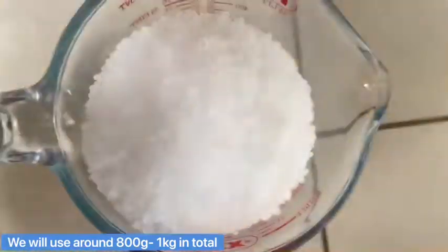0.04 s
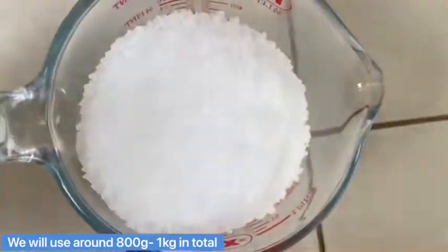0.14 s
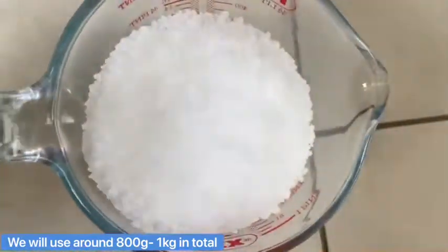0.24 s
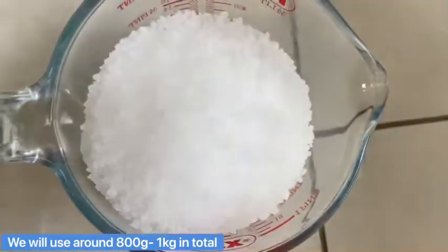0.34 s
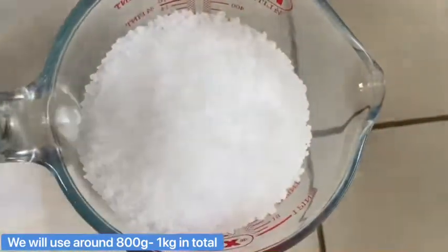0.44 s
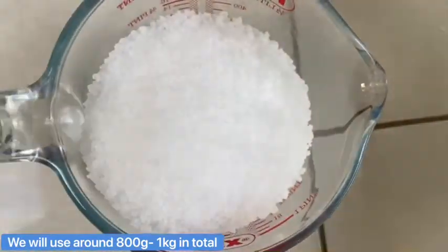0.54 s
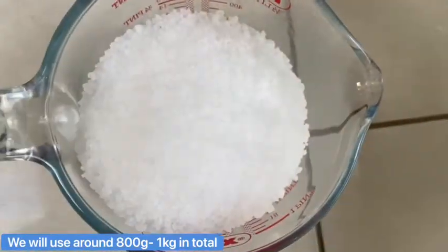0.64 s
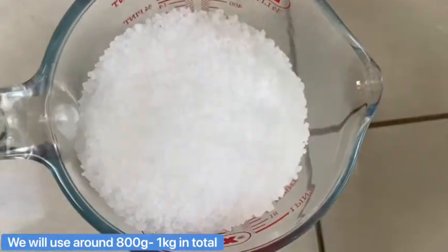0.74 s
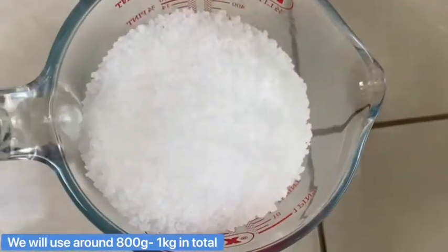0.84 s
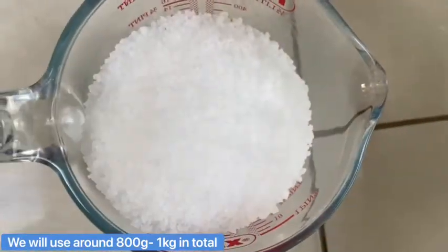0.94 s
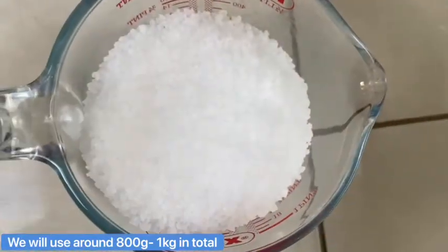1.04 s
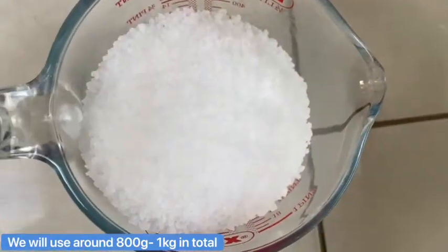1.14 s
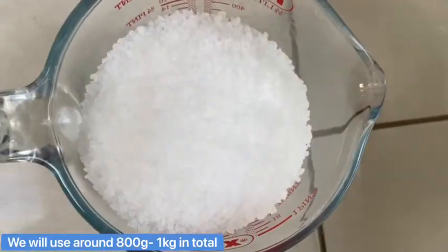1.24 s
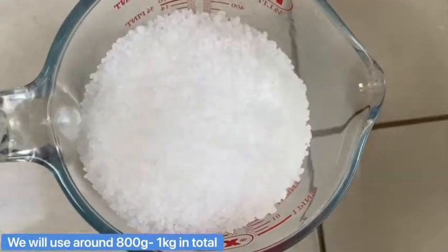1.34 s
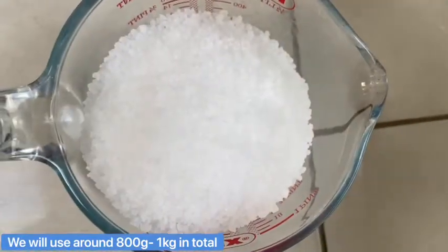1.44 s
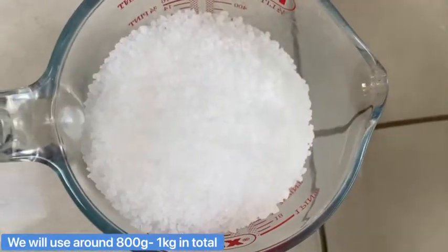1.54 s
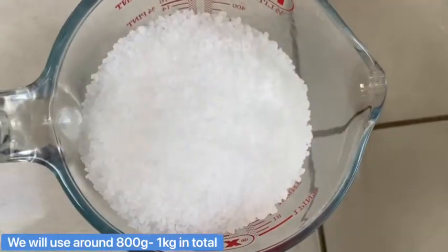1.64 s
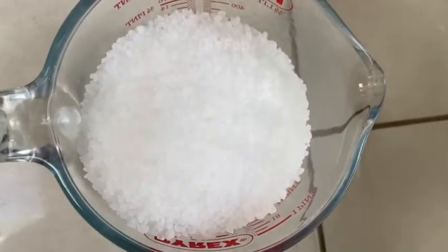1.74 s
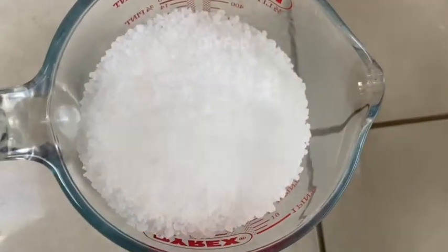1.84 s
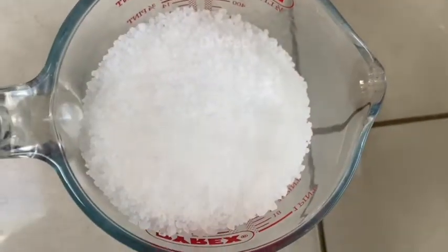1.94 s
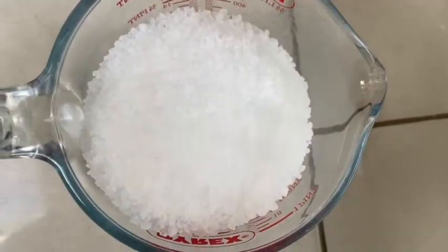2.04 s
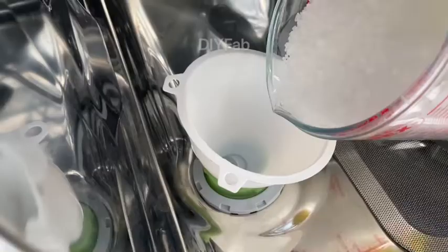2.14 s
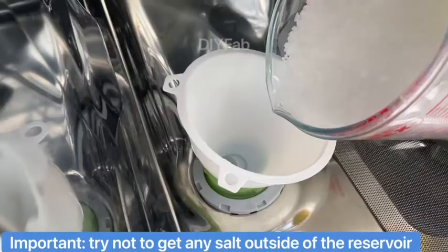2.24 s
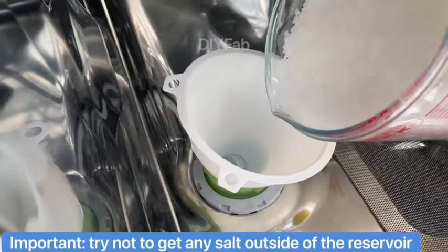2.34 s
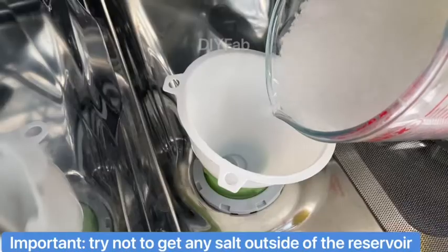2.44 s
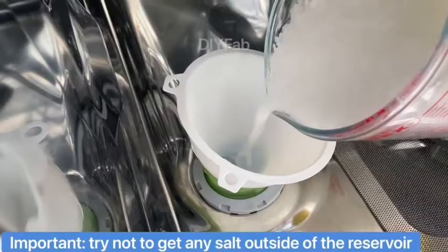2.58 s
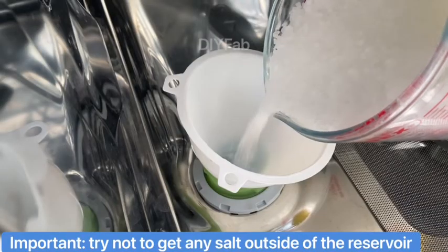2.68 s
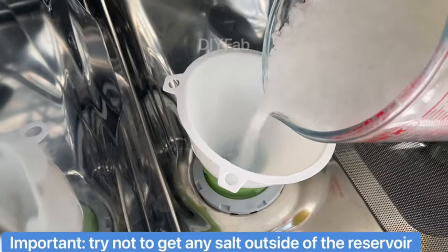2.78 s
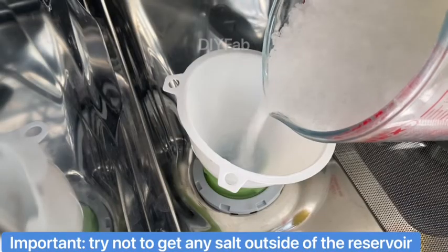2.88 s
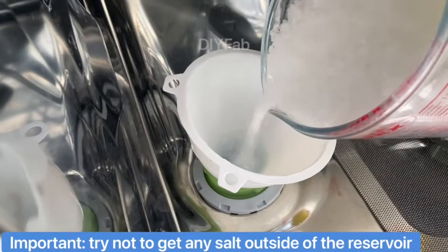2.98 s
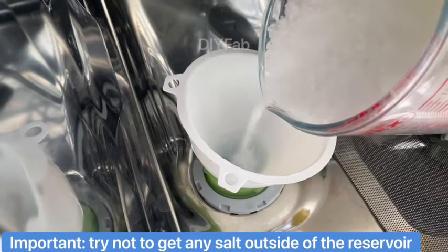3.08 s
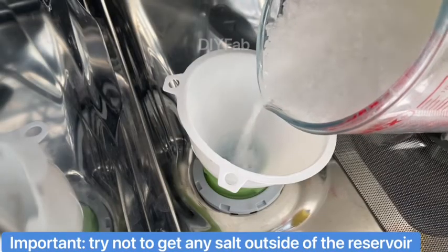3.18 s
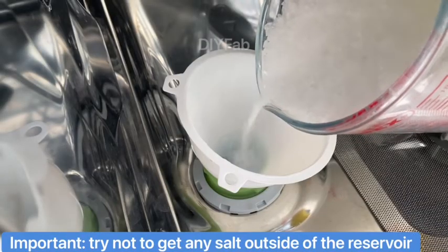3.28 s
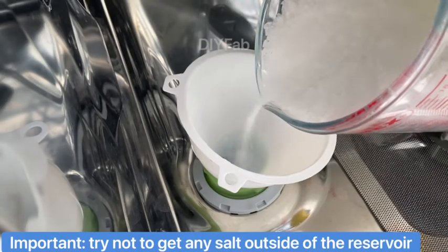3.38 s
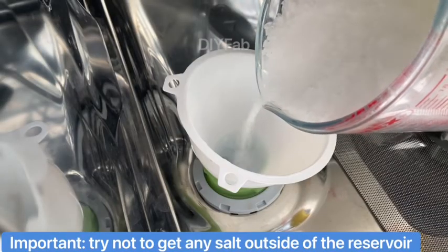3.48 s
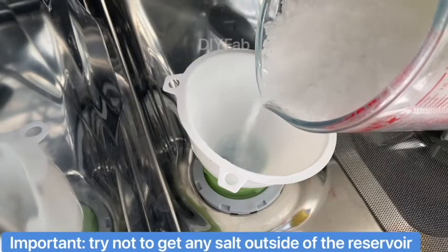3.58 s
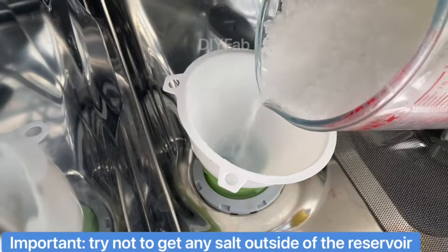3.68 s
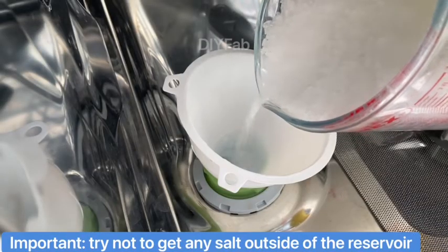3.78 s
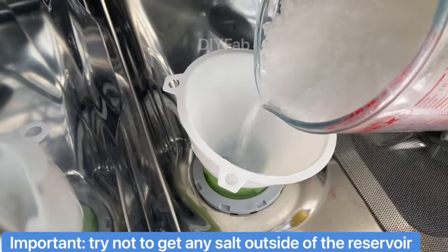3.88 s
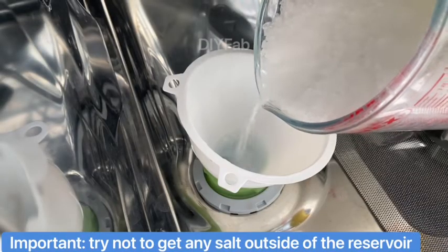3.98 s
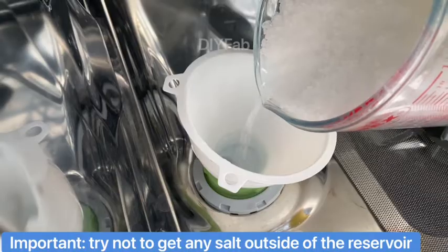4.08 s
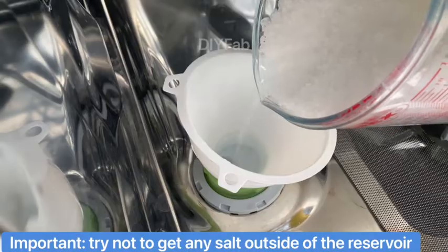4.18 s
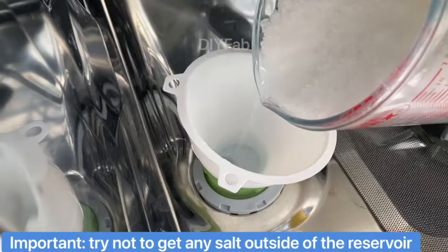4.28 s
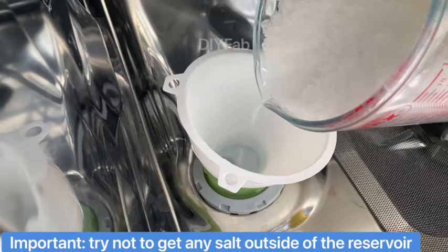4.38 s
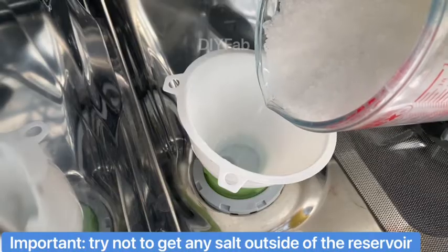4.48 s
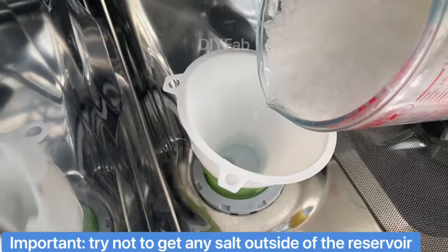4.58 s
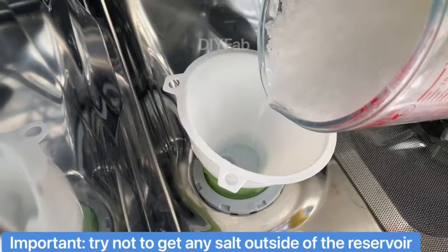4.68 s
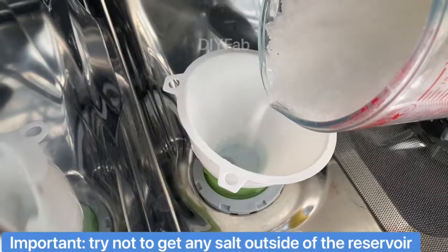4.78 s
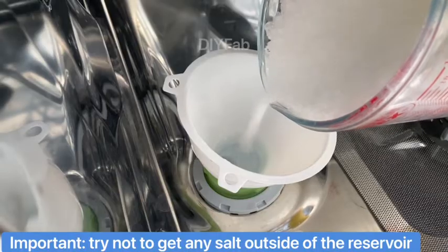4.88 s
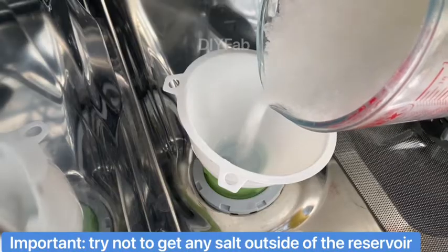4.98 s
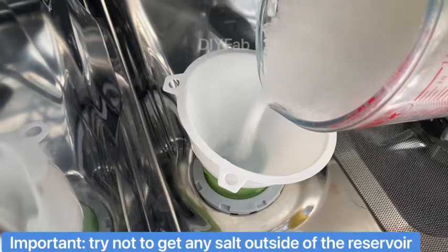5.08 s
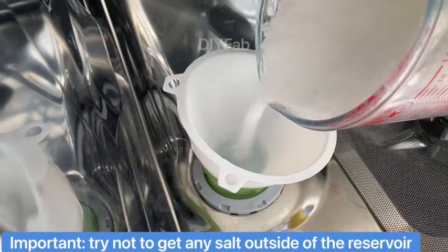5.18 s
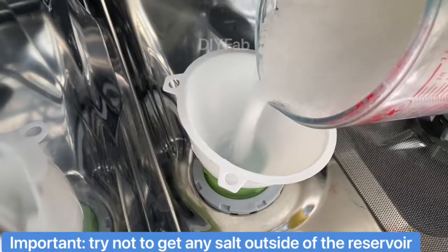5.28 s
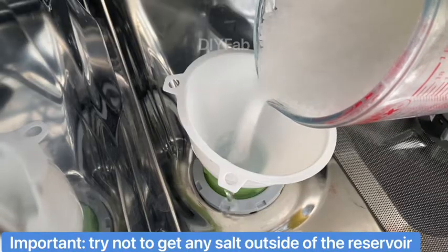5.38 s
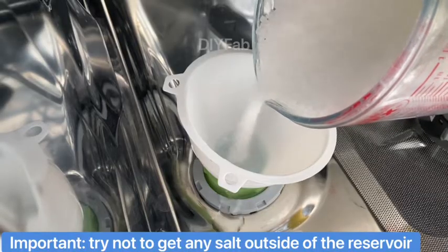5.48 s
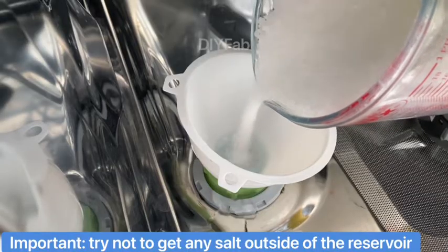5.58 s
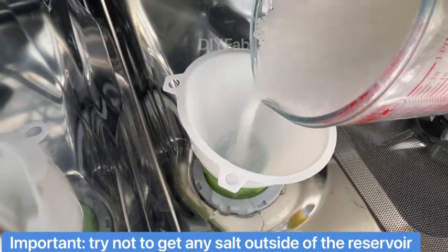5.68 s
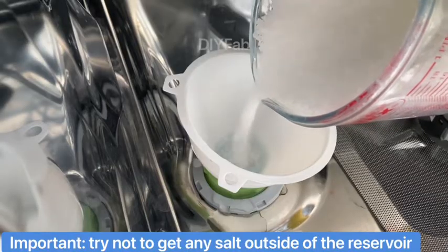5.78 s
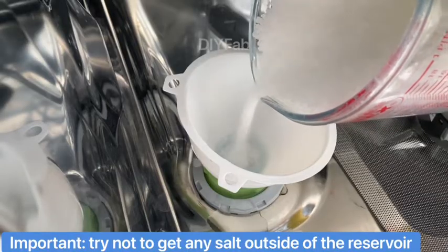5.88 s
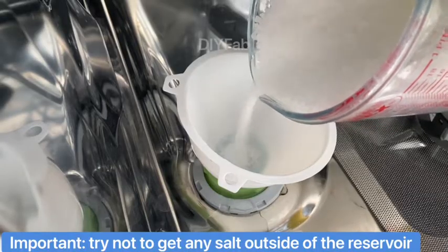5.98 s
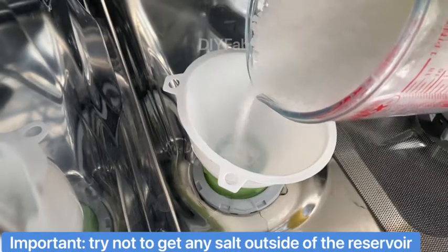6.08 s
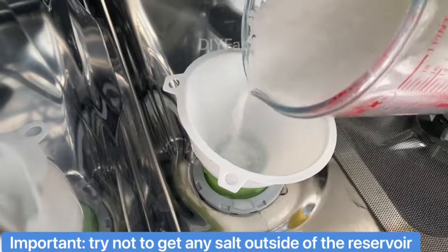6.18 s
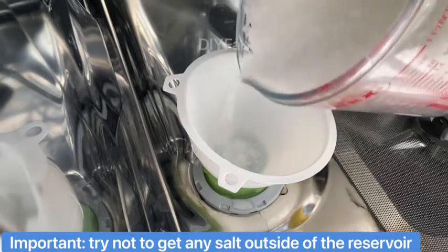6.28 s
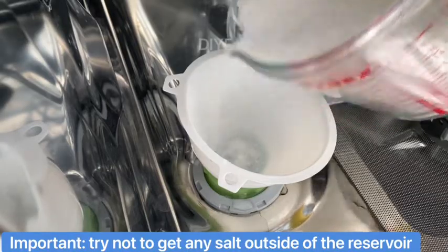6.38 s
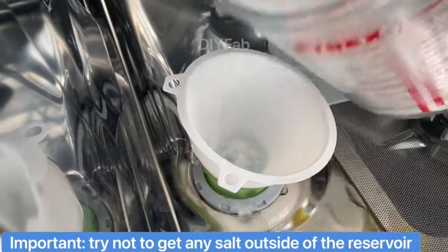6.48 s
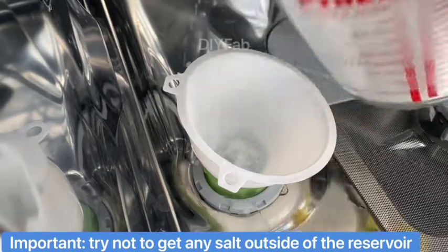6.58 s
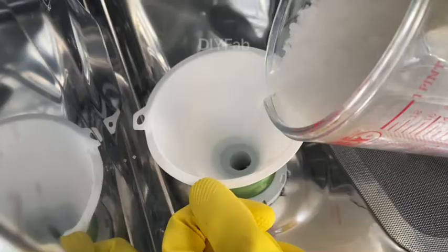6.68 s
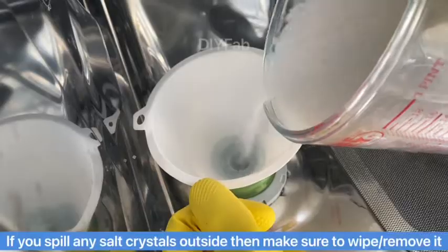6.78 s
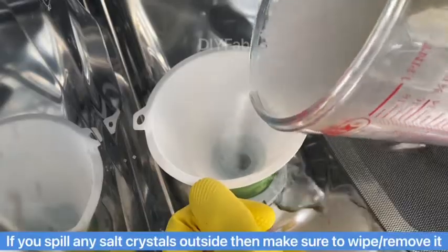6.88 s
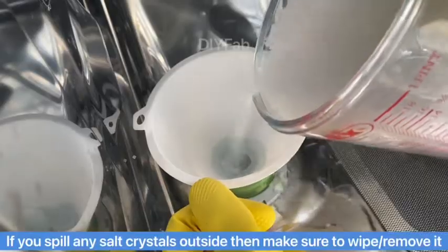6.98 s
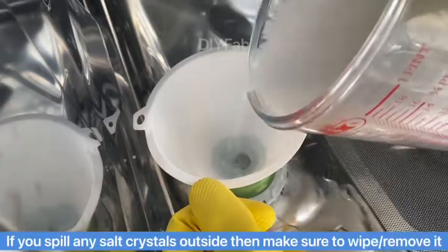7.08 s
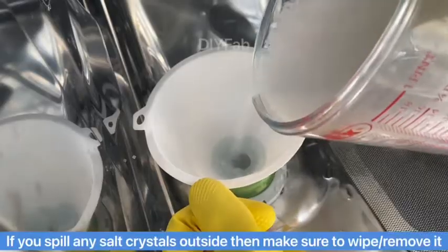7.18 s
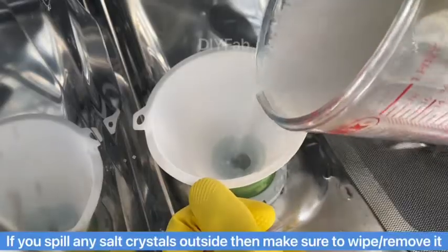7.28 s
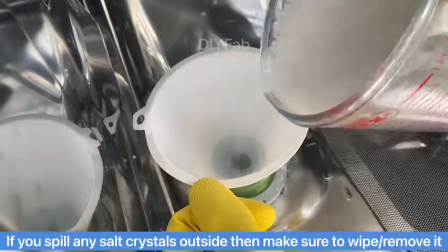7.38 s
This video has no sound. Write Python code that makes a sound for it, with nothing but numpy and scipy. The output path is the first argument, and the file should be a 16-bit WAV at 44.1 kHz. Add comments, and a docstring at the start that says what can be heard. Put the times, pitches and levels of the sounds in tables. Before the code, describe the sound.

From 0 to 0.55 seconds a plastic bag crinkles close by: a crisp crackle at once, a lull, then denser snaps from 0.35 to 0.53. It cuts to very quiet room noise, with tiny taps near 0.9 and 1.1, faint rubbing around 1.5, and soft dull knocks of a full glass jug from 1.8 to 2.14. Then a steel tub's low room noise and faint wavering machine hum begin. At about 2.49 salt slumps over the glass lip in a loud, bright, ticking rush until 2.7, thinning to a light hollow patter on the plastic funnel. It nearly stops around 4.6, with sparse pings, then swells from 4.85, with sharp ticks and another surge at 6.3. At 6.6 it cuts to triple speed: a higher hum, a strong brittle rattle at 6.84 to 6.96, another near 7.05, then smaller scattered clicks to the end, around 7.4.

```python
"""Coarse salt slides over a glass jug's lip and streams into a plastic funnel in a steel dishwasher tub.
Its many small impacts are random clicks, each with a short ring, filtered by glass and funnel; large crystals tick.
Before that a plastic bag crinkles in a quick rush, and the full jug is lifted with soft knocks, as filtered bursts.
The last of the salt rattles down at triple speed, with brighter, shorter grains.
Room noise lies under it all; drifting sine tones of a machine join with the pour and are higher at triple speed."""
import sys
import numpy as np
from scipy import signal
from scipy.fft import rfft, irfft, next_fast_len
from scipy.io import wavfile
from scipy.ndimage import uniform_filter1d

SR = 44100
rng = np.random.default_rng(int(sys.argv[2]) if len(sys.argv) > 2 else 0)


def wav_out(sig):
    """Save sig, one row per channel (or a flat mono array), as 16-bit PCM at SR to the path in sys.argv[1]."""
    wavfile.write(sys.argv[1], SR, np.round(np.clip(np.atleast_2d(sig).T, -1, 1) * 32767).astype(np.int16))


N = 327663
TIME = np.arange(N) / SR
# starts in seconds: lifting the jug, the pour in the tub, the last salt at triple speed
JUG_S, TUB_S, FAST_S = 0.55, 2.145, 6.607


def amp(db):
    """Level law: converts decibels to an amplitude gain."""
    return 10 ** (np.asarray(db) / 20)


def unit(x):
    """Normalisation: scales a stereo sound so that the mean of its channels has rms 1."""
    return x / np.sqrt(np.mean(x.mean(0) ** 2) + 1e-20)


def read(table, hz):
    """Logarithmic pitch scale: interpolates a table's columns over log frequency."""
    table_hz, *columns = np.transpose(table)
    return [np.interp(np.log(hz + 1), np.log(table_hz + 1), c) for c in columns]


def between(start, end, fade=.008):
    """Gating: passes sound between two times, with short ramps."""
    opening = np.clip((TIME - start) / fade + .5, 0, 1)
    closing = np.clip((end - TIME) / fade + .5, 0, 1)
    return opening * closing


def curve(points):
    """Amplitude envelope: one gain per sample from straight lines in decibels."""
    return amp(np.interp(TIME, *np.transpose(points)))


def swells(rows, rise_db_per_s):
    """Incoherent addition: gestures rise, hold and fade, and overlapping ones add in power."""
    power = np.zeros(N)
    for s, length, db, fade_db_per_s in rows:
        early = np.maximum(s - TIME, 0)
        late = np.maximum(TIME - s - length, 0)
        level_db = db - rise_db_per_s * early - fade_db_per_s * late
        power += amp(np.maximum(level_db, -200)) ** 2
    return np.sqrt(power)


def clumps(spread_db, count):
    """Random modulation: an uneven gain, as crystals and folds give way in small groups."""
    knots = np.linspace(0, TIME[-1], count)
    return amp(spread_db * np.interp(TIME, knots, rng.standard_normal(count)))


def add(mix, s, sound):
    """Superposition: adds a sound to the mix at time s."""
    part = mix[:, max(round(s * SR), 0):][:, :sound.shape[1]]
    part += sound[:, :part.shape[1]]


def colour(x, spectrum, size=4096):
    """Minimum-phase filtering: a causal response, so the body rings after each click."""
    log_gain = np.log(amp(read(spectrum, abs(np.fft.fftfreq(size, 1 / SR)))[0]))
    response = np.exp(np.conj(signal.hilbert(log_gain)))
    taps = np.fft.ifft(response).real[:size // 2]
    return signal.oaconvolve(x, taps[None], axes=1)[:, :x.shape[1]]


def ports(x, table):
    """Interaural-style coherence: two unrelated versions of a sound become left and right microphone ports."""
    size = next_fast_len(x.shape[1] + 512)
    a, b = rfft(x, size)
    same, lead, left_db = read(table, np.fft.rfftfreq(size, 1 / SR))
    same = np.clip(same, 0, 1)
    right = (same * a + np.sqrt(1 - same ** 2) * b) * np.exp(-1j * lead)
    return irfft([a * amp(left_db / 2), right * amp(-left_db / 2)], size)[:, :x.shape[1]]


def walls(x, echo_db, count=8):
    """Early reflection: delayed copies from the hard surfaces close by."""
    out = x.copy()
    for delay_s, sign in zip(rng.uniform(.001, .009, count), rng.choice([-1, 1], count)):
        add(out, delay_s, sign * amp(echo_db) * x)
    return out


def burst(crack_s, tail_db, t60, size=6000):
    """Impact and reverberation: a brief noisy crack, then dense reflections that decay by 60 dB in t60."""
    t = np.arange(size) / SR
    return rng.standard_normal((2, size)) * (np.exp(-t / crack_s) + amp(tail_db - 60 * t / t60))


def grains(per_s, spread_db, crack_s, tail_db, t60, ring_db, ring_s, flow=1, top_hz=14000, count=8):
    """Shot noise: random impacts of uneven size, sparser in a thin flow; each family has its own short ring."""
    out, t = np.zeros((2, N)), np.arange(3000) / SR
    for hz in np.geomspace(3700, top_hz, count):
        size = amp(spread_db * np.minimum(rng.exponential(1, N), 4)) / np.sqrt(flow)
        struck = rng.random(N) < flow * per_s / count / SR
        clicks = struck * size * rng.choice([-1, 1], N)
        phase = hz * rng.uniform(.93, 1.07) * t + rng.random((2, 1))
        ring = np.sin(2 * np.pi * phase) * np.exp(-t / ring_s)
        grain = burst(crack_s, tail_db, t60, size=len(t)) + amp(ring_db) * ring
        out += signal.oaconvolve(clicks[None], grain, axes=1)[:, :N]
    return out


def tinkle(per_s, low_hz, high_hz, spread_db, t60, size=2000):
    """Damped oscillation: small rebounding crystals, each with a short ring at its own pitch."""
    out, t = np.zeros((2, N)), np.arange(size) / SR
    for when, pitch, strength, *phase in rng.random((int(per_s * N / SR), 5)):
        hz = low_hz * (high_hz / low_hz) ** pitch
        decay = amp(spread_db * strength ** 2 - 60 * t / t60)
        ring = np.sin(2 * np.pi * (hz * t + np.c_[phase])) * decay
        add(out, when * N / SR, ring)
    return out


def strike(sound, strength_db):
    """Short-time power: sets the rms of the loudest two milliseconds to half the given strength."""
    power = uniform_filter1d(sound.mean(0) ** 2, size=88)
    return sound * amp(strength_db) / np.sqrt(power.max()) / 2


def blows(rows, port_table, push_db, crack_s, tail_db, t60, shrink=0):
    """Resonance: a clean push and rough crack ring one broad band; with shrink, higher ones are briefer."""
    out, hz = np.zeros((2, N)), np.geomspace(20, 20000, num=90)
    for s, db, centre_hz, octaves in rows:
        away = np.log2(hz / centre_hz) / octaves
        shape_db = np.maximum(-20 * np.log10(1 + away ** 4), -100)
        stretch = (1000 / centre_hz) ** shrink  # crack_s and t60 hold at 1 kHz
        hit = burst(crack_s * stretch, tail_db, t60 * stretch)
        hit[:, 0] += amp(push_db) * np.sqrt(stretch)
        thud = colour(hit, np.c_[hz, shape_db]) * np.linspace(1, 0, num=hit.shape[1])
        add(out, s, strike(ports(thud, port_table), db))
    return out


def ticks(rows, spectrum, port_table, crack_s, tail_db, t60):
    """Spectral tilt: single large crystals, each with its own balance of bass and treble."""
    out, (hz, level_db) = np.zeros((2, N)), np.transpose(spectrum)
    for s, db, bright_db in rows:
        tilted = np.c_[hz, level_db + bright_db * np.log2(hz / hz[-1])]
        add(out, s, strike(ports(colour(burst(crack_s, tail_db, t60), tilted), port_table), db))
    return out


# Room at the two ports. Each row: frequency in Hz, likeness from 0 to 1, left lead in radians,
# left minus right in dB.
ROOM_PORTS = [(60, .985, 0, .3), (300, .86, 0, 1), (8000, .5, 0, 1)]


def air(spectrum):
    """Stationary noise: steady filtered room noise with rms 1."""
    return unit(ports(colour(rng.standard_normal((2, N)), spectrum, size=16384), ROOM_PORTS))


def hum(lines, waver, count=40):
    """Line spectrum: machine tones that drift in phase (waver in radians) and strength."""
    knots, out = np.linspace(0, TIME[-1], count), np.zeros(N)
    for hz, db in lines:
        drift, swell = (np.interp(TIME, knots, v) for v in rng.standard_normal((2, count)))
        tone = np.sin(2 * np.pi * hz * TIME + waver * drift)
        out += np.sqrt(2) * amp(db + 1.8 * swell) * tone
    return out


# Room noise by the bag. Each row: frequency in Hz, relative density in dB per Hz.
BAG_AIR = [(30, -28), (150, -28), (235, 3.5), (335, -12), (700, -15.5), (2000, -25), (8000, -46.5)]
# Room noise by the jug. Each row: frequency in Hz, relative density in dB per Hz.
JUG_AIR = [(25, -10), (55, -2.5), (110, -9), (170, -16.5), (240, -8.5), (450, -26), (930, -41), (3500, -48),
           (12000, -58)]
# Room noise in the tub. Each row: frequency in Hz, relative density in dB per Hz.
TUB_AIR = [(20, -15.5), (48, 0), (80, 1), (115, -4.5), (150, -11), (200, -19), (290, -10.5), (400, -18),
           (900, -25.5), (2000, -38), (8000, -70)]
# Room noise at triple speed. Each row: frequency in Hz, relative density in dB per Hz.
FAST_AIR = [(30, -39), (90, -13), (140, 4.5), (230, 1.5), (430, -8.5), (520, -15), (1100, -7.5),
            (1500, -17), (8000, -28)]
# Machine tones in the tub. Each row: frequency in Hz, level in dB before gain and swell.
HUM = [(48.4, -55), (80.7, -54.5), (150.7, -64), (371.4, -64.5)]
# Machine tones at triple speed. Each row: frequency in Hz, mean level in dB.
FAST_HUM = [(140.0, -65), (393.0, -69.5), (1120, -67)]
# Swell of noise and hum in the tub. Each row: time in seconds, gain in dB.
DRONE = [(3.8, -6), (5.2, -2.5), (6.6, -5)]


def kitchen():
    """Background level: room noise, joined by hum in the tub and at triple speed."""
    start = amp(-61) * air(BAG_AIR) * between(-1, JUG_S)
    start += amp(-59) * air(JUG_AIR) * between(JUG_S, TUB_S)
    tub = amp(-52) * air(TUB_AIR) + amp(2.0) * hum(HUM, waver=1.48)
    fast = amp(-57.5) * air(FAST_AIR) + hum(FAST_HUM, waver=2.55)
    return start + tub * curve(DRONE) * between(TUB_S, FAST_S) + fast * between(FAST_S, N)


# Squeezes of the bag, firm or light. Each row: start in seconds, length in seconds,
# level in dB before the layer gains, fade in dB per second.
SQUEEZES = [(0, 0.022, -41, 260.5), (.07, 0.042, -56.5, 147.5), (.354, 0.021, -37.5, 347.5),
            (.405, 0.0055, -40.5, 479.5), (.42, 0.092, -51, 902.5), (.504, 0.028, -35, 1205)]
# Folds snapping, and at the very start a broad click. Each row: start in seconds, strength in dB, centre in Hz,
# width in octaves.
SNAPS = [(0.002, -19, 1450, 3), (0.017, -19.5, 464, 0.78), (0.028, -23, 527, 0.74),
         (0.1052, -25, 3060, 1.32), (0.169, -19.5, 1210, 0.82), (0.353, -24, 1200, 0.86),
         (0.376, -21, 1070, 0.55), (0.4, -26.5, 1100, 1.5), (0.4992, -16, 1960, 1.04),
         (0.503, -29, 340, 0.65), (0.52, -29.5, 328, 0.68)]
# Body of the rustle. Each row: frequency in Hz, relative density in dB per Hz.
RUSTLE = [(100, -31.5), (230, -5), (400, 1.5), (530, -8), (1000, -2.5), (1700, -8), (3000, -14.5),
          (6000, -22), (15000, -41)]
# Bright crackle. Each row: frequency in Hz, relative density in dB per Hz.
CRACKLE = [(300, -26), (1500, 0), (3500, -2.5), (6500, -3.5), (10000, -5), (15500, -3.5)]
# Bag at the two ports. Each row: frequency in Hz, likeness from 0 to 1, left lead in radians,
# left minus right in dB.
BAG_PORTS = [(300, .95, .2, 2), (2200, .65, .3, 1), (4500, .35, 2.3, 2), (7000, .6, 3.1, 3),
             (11000, .4, .4, 3), (13500, .75, -.3, 3)]


def bag():
    """Buckling: film crumples in tiny clicks at each squeeze, with a few large snaps."""
    crumple = swells(SQUEEZES, rise_db_per_s=1096)
    # a faint rest level remains between squeezes
    rustle, crackle = crumple + amp(-63.5), crumple + amp(-78)
    buckles = grains(per_s=1700, spread_db=3.8, crack_s=.0004, tail_db=-19, t60=.025,
                     ring_db=-17, ring_s=.0006, count=4)
    buckles = walls(buckles, echo_db=-21.5) * clumps(spread_db=2.0, count=900)
    body = amp(1.0) * rustle * unit(ports(colour(buckles, RUSTLE), BAG_PORTS))
    fizz = amp(4.5) * crackle * unit(ports(colour(buckles, CRACKLE), BAG_PORTS))
    snaps = blows(SNAPS, BAG_PORTS, push_db=16.5, crack_s=0.0016, tail_db=-2.5, t60=0.084, shrink=0.82)
    return (body + fizz + snaps) * between(-1, JUG_S)


# Fingers rubbing on the handle. Each row: start in seconds, length in seconds, level in dB,
# fade in dB per second.
RUBS = [(1.43, 0.28, -72.5, 50), (1.94, 0.0095, -55.5, 177.5), (2.06, 0.08, -65, 95)]
# Colour of the rubbing. Each row: frequency in Hz, relative density in dB per Hz.
RUB_COLOUR = [(200, -21), (600, 0.5), (760, -13.5), (1000, -25.5), (3000, -47.5)]
# Knocks of the jug, and at 2.14 s a faint click as the scene changes to the tub. Each row: start in seconds,
# strength in dB, centre in Hz, width in octaves.
KNOCKS = [(0.889, -54, 589, 0.4), (0.89, -66, 1995, 0.25), (1.08, -60, 3540, 0.55),
          (1.555, -61, 1935, 0.12), (1.815, -39.5, 75.2, 0.78), (1.886, -33, 520, 0.45),
          (1.9285, -35, 532, 0.4), (1.948, -41.5, 50.4, 0.4), (2.0525, -35, 555, 0.54),
          (2.053, -52.5, 1100, 1.3), (2.058, -34.5, 57.7, 0.52), (2.128, -39.5, 350, 0.88),
          (2.14, -63, 2990, 1)]


def jug():
    """Impact and friction: the full jug knocks dully and rubs in the hand as it is lifted."""
    rub = swells(RUBS, rise_db_per_s=298) * air(RUB_COLOUR) * between(JUG_S, TUB_S)
    return rub + blows(KNOCKS, ROOM_PORTS, push_db=20, crack_s=0.0027, tail_db=-7, t60=0.12, shrink=.4)


# Modes of the nearly empty funnel, heard at triple speed. Each row: frequency in Hz, relative level in dB.
FUNNEL_MODES = [(1730, -5), (2020, 4), (3000, 3), (3650, 4)]


def funnel(x, t60, size=4000):
    """Modal resonance: the thin plastic cone rings briefly under each crystal."""
    t = np.arange(size) / SR
    modes = sum(amp(db - 60 * t / t60) * np.sin(2 * np.pi * hz * t) for hz, db in FUNNEL_MODES)
    return signal.oaconvolve(x, modes[None] / np.linalg.norm(modes), axes=1)[:, :N]


# Rushes of the last salt. Each row: start in seconds, length in seconds, level in dB before
# the layer gains, fade in dB per second.
RUSHES = [(6.69, 0.22, -49.5, 60), (6.838, .118, -36, 326), (7.03, 0.067, -40, 112),
          (7.2, 0.0154, -43.5, 222), (7.28, 0.03, -47, 164)]
# Colour of the rattle. Each row: frequency in Hz, relative density in dB per Hz.
RATTLE = [(300, -28), (700, -15), (1750, -3), (2350, -8), (2900, 4.5), (4200, 5.5), (5200, -6.5),
          (5900, -4.5), (6800, -8.5), (8000, -1), (10200, 0.5), (15000, 5.5)]
# Single last crystals. Each row: start in seconds, strength in dB, brightness in dB per octave.
LAST_TICKS = [(6.8059, -24, 3), (6.8327, -18, 1.5), (6.8848, -19, 1), (7.009, -27.5, -1), (7.054, -22, 4),
              (7.0826, -34, -1.5), (7.103, -34, 2), (7.119, -33, 0), (7.1396, -28.5, -3),
              (7.1783, -28, -1.5), (7.1993, -23, 0.5), (7.279, -27.5, 0), (7.3058, -27.5, -2.5),
              (7.319, -25, -1.5), (7.3655, -32, -1.5), (7.385, -30.5, -2.5)]
# Pings as the last salt starts to fall. Each row: start in seconds, strength in dB, centre in Hz,
# width in octaves.
LAST_PINGS = [(6.6875, -31, 9400, 0.13), (6.751, -33, 10240, 0.049), (6.774, -35, 8100, 0.26)]
# Last salt at the two ports. Each row: frequency in Hz, likeness from 0 to 1, left lead in radians,
# left minus right in dB.
FAST_PORTS = [(200, .97, 0, 1), (1500, .8, .1, 2), (2800, .65, 1.1, 4), (3700, .5, 2.8, 6),
              (5500, .4, .3, 4), (11500, .8, .2, 3), (15000, .3, 0, 5)]


def last_salt():
    """Source and resonator: at triple speed, rushes of short bright grains and single ones ring the funnel."""
    level = np.hypot(swells(RUSHES, rise_db_per_s=653), amp(-79))  # over a faint trickle
    flow = np.clip(level / amp(-42.0), .35, 2)  # a stronger rush holds more crystals
    impacts = grains(per_s=1700, spread_db=4.3, crack_s=0.00012, tail_db=-23.0, t60=0.047,
                     ring_db=-20, ring_s=0.00074, flow=flow, count=3)
    rattle = unit(ports(colour(walls(impacts, echo_db=-6.5), RATTLE), FAST_PORTS))
    pitched = tinkle(per_s=1200, low_hz=8000, high_hz=15000, spread_db=10, t60=.012)
    rebounds = amp(-11) * unit(ports(pitched, FAST_PORTS))
    large = ticks(LAST_TICKS, RATTLE, FAST_PORTS, crack_s=.0009, tail_db=-8, t60=.05)
    pings = blows(LAST_PINGS, FAST_PORTS, push_db=17, crack_s=0.0023, tail_db=-10, t60=0.037)
    hits = level * (rattle + rebounds) * between(FAST_S, N) + large
    return hits + amp(-14.5) * funnel(hits, t60=0.057) + pings


# Ringing of the glass jug under the sliding salt. Each entry: frequency in Hz.
GLASS_HZ = [2102, 3706, 5500, 6260, 6884, 7423, 10793]


def glass(x, t60, size=8000):
    """Modal damping: the jug's modes die away soon, damped by the salt that it holds."""
    t = np.arange(size) / SR
    modes = sum(np.sin(2 * np.pi * hz * t) for hz in GLASS_HZ) * amp(-60 * t / t60)
    return signal.oaconvolve(x, modes[None], axes=1)[:, :N]


# Stream as the jug is tilted. Each row: time in seconds, level in dB before the layer gains.
FLOW = [(2.15, -82.5), (2.45, -60.5), (2.69, -44.5), (3.15, -60), (3.85, -60), (4.1, -62.5), (4.62, -67.5),
        (4.86, -51.5), (5.65, -50.5), (6.08, -55.5), (6.27, -47.5), (6.48, -57), (6.6, -57.5)]
# Funnel's hollow ring relative to the patter. Each row: time in seconds, gain in dB before the layer gain.
HOLLOW = [(2.47, -11), (2.5, 6.5), (2.62, -2), (2.95, 1), (3.4, 4.5), (3.8, -4.5), (4.9, -10), (5.4, -2.5),
          (5.9, -1.5), (6.35, -15.5), (6.55, -9)]
# The heap slumps and a sheet of salt slides over the lip. Each row: start in seconds,
# length in seconds, level in dB before the layer gains, fade in dB per second.
SLUMPS = [(2.488, 0.022, -37, 500), (2.548, 0.025, -34, 189), (2.603, 0.054, -34.5, 205),
          (5.6, 0.042, -53.5, 51), (6.295, 0.11, -43.5, 101)]
# Patter on the funnel. Each row: frequency in Hz, relative density in dB per Hz.
PATTER = [(200, -15), (450, -10), (900, -14), (1900, -9), (3300, -5), (3850, -3), (4300, -4.5), (4850, 1),
          (5800, -4.5), (7500, 0), (11000, -40)]
# Sliding over the lip. Each row: frequency in Hz, relative density in dB per Hz.
SLIDE = [(500, -60), (2000, -6.5), (3100, -1.5), (5000, 0.5), (6000, 2.5), (7100, 10.5), (8500, 4.5),
         (11000, 8.5), (13000, 7), (15500, 0.5)]
# Air in the funnel. Each row: frequency in Hz, relative density in dB per Hz.
FUNNEL_AIR = [(400, -22), (850, -17.5), (1050, -8), (1270, 2), (1400, -10), (1520, -14), (2200, -25.5)]
# Colour of a tick. Each row: frequency in Hz, relative density in dB per Hz.
TICK = [(250, -29), (700, -32), (1250, -2), (1800, -9), (3000, 1.5), (4900, 11.5), (6000, 9.5),
        (7100, 13.5), (11000, 8.5), (15500, 4.5)]
# Large crystals hitting the funnel. Each row: start in seconds, strength in dB, brightness in dB per octave.
TICKS = [(2.4872, -15, 1.5), (2.5095, -22, 2), (2.5213, -17, 0), (2.5462, -15.5, -0.5), (2.5552, -18, 5),
         (2.5835, -19, 10), (2.5892, -17, -2), (2.606, -17.5, -1), (2.6228, -22, -4), (2.6518, -20, -1.5),
         (3.344, -35, 2.5), (3.7155, -32.5, -3.5), (4.168, -39, -6), (4.3674, -34, 0.5), (4.4297, -28.5, 2),
         (4.5322, -41, -1), (4.6558, -40, 0), (4.683, -31.5, -5.5), (4.736, -34, -5), (4.7422, -29, -4),
         (4.8286, -19.5, -3.5), (5.581, -30, -2), (5.7629, -15, 3), (5.824, -27.5, 5.5),
         (5.9205, -23.5, 8.5), (6.0409, -30, -4.5), (6.1272, -30, 3), (6.1836, -28, 0), (6.2025, -29, 6),
         (6.2919, -16, 0.5), (6.3592, -20.5, 10), (6.3804, -19.5, -2), (6.428, -26.5, -2.5),
         (6.4514, -27.5, 2), (6.459, -25.5, -3), (6.475, -27, -3), (6.492, -22, -5.5), (6.532, -21.5, 2.5),
         (6.5859, -27.5, 2.5), (6.601, -37.5, 0)]
# Crystals that rebound with a ping. Each row: start in seconds, strength in dB, centre in Hz,
# width in octaves.
PINGS = [(2.859, -38, 4600, 0.16), (4.171, -40.5, 5400, 0.26), (4.191, -37.5, 4500, 0.23),
         (4.3066, -44, 6300, 0.26), (4.4657, -42, 5750, 0.25), (5.0225, -36.5, 6200, 0.27),
         (5.197, -40, 4220, 0.26), (5.274, -34, 4080, 0.16), (5.5473, -35, 5330, 1)]
# Tub at the two ports. Each row: frequency in Hz, likeness from 0 to 1, left lead in radians,
# left minus right in dB.
TUB_PORTS = [(200, .97, 0, 1), (750, .75, .1, 3), (1250, .65, 2.7, 4), (1900, .4, 1, 5), (2800, .65, .2, 3),
             (4200, .8, .1, 3), (5400, .45, -.5, 3), (7200, .97, 0, 0), (8700, .998, -2.85, 0),
             (9500, .998, -3.4, 0), (10400, .9, -6, 0), (11900, .95, -6.6, 0), (12700, .998, -9.1, 0),
             (13700, .998, -9.7, 0), (14500, .8, -12.3, 0)]


def pour():
    """Granular flow: crystals scrape glass, patter on the funnel and excite its air; slumps mostly scrape."""
    stream, slump = curve(FLOW), swells(SLUMPS, rise_db_per_s=8000)
    patter_gain = np.hypot(stream, amp(-11) * slump)
    slide_gain = np.hypot(amp(-6.0) * stream, slump)
    hollow_gain = patter_gain * curve(HOLLOW)
    flow = np.clip(patter_gain / amp(-53.0), .25, 3)  # a louder stream holds more crystals
    spurts = clumps(spread_db=0.5, count=400)  # the salt leaves the lip unevenly

    impacts = grains(per_s=1900, spread_db=6.0, crack_s=0.00046, tail_db=-9.0, t60=0.19,
                     ring_db=-20.0, ring_s=0.0088, flow=flow, count=4)
    scrapes = grains(per_s=2600, spread_db=4.2, crack_s=.0002, tail_db=-17, t60=.07,
                     ring_db=-14, ring_s=.0008, flow=flow, count=4)
    # smaller strays fall at random
    strays = grains(per_s=36, spread_db=2, crack_s=.0007, tail_db=-3, t60=.06,
                    ring_db=-14, ring_s=.002, count=2)
    pitched = tinkle(per_s=150, low_hz=3500, high_hz=7500, spread_db=17, t60=.028)
    wall = walls(impacts, echo_db=-15)
    lip = walls(unit(scrapes) + amp(-18) * unit(glass(scrapes, t60=.15)), echo_db=-13.5)

    patter = amp(1.07) * patter_gain * unit(ports(colour(wall, PATTER), TUB_PORTS))
    slide = amp(4.0) * slide_gain * unit(ports(colour(lip, SLIDE), TUB_PORTS))
    hollow = amp(-1.5) * hollow_gain * unit(ports(colour(impacts, FUNNEL_AIR), TUB_PORTS))
    small = amp(-6) * patter_gain * unit(ports(colour(strays, TICK), TUB_PORTS))
    rebounds = amp(-7) * patter_gain * unit(ports(pitched, TUB_PORTS))
    large = ticks(TICKS, TICK, TUB_PORTS, crack_s=0.0014, tail_db=-5.5, t60=0.088)
    pings = blows(PINGS, TUB_PORTS, push_db=24.5, crack_s=0.0026, tail_db=20, t60=0.074)
    shower = (patter + slide + hollow + small + rebounds) * spurts
    return shower * between(TUB_S, FAST_S) + large + pings


def scene():
    """Superposition: the sum of all sources."""
    return kitchen() + bag() + jug() + last_salt() + pour()


def record(dry):
    """Band limiting: a linear-phase low-pass at 15.7 kHz."""
    taps = signal.firwin(301, 15700, window=("kaiser", 8), fs=SR)
    return signal.oaconvolve(dry, taps[None], "same")


dry = scene()
out = record(dry)
wav_out(out)
```